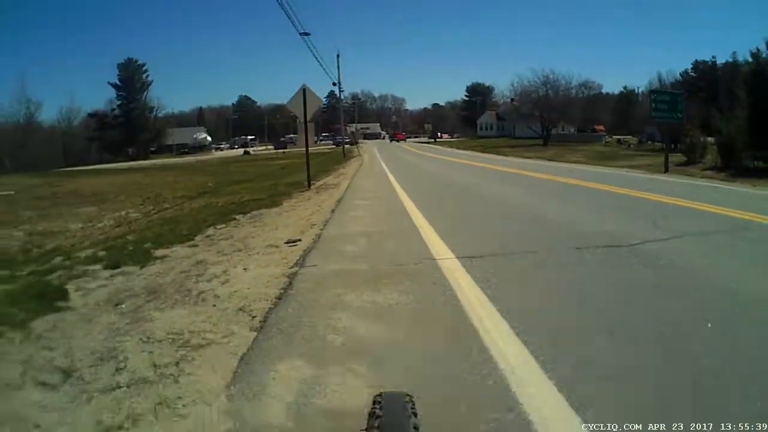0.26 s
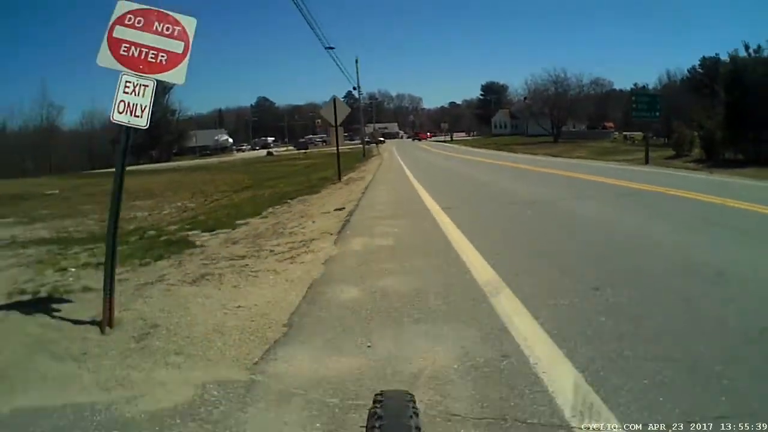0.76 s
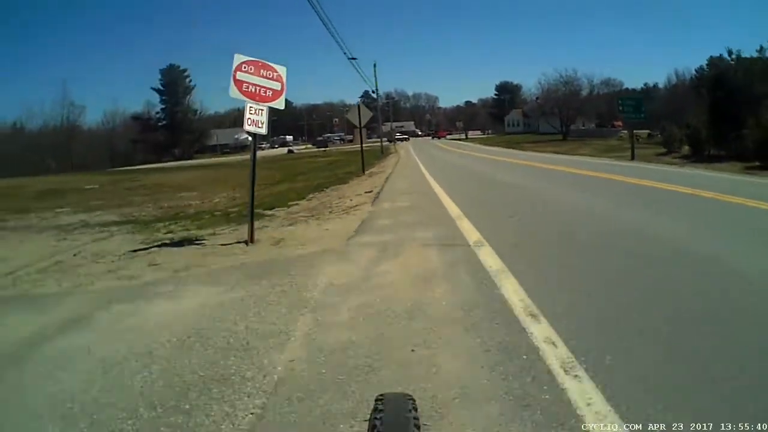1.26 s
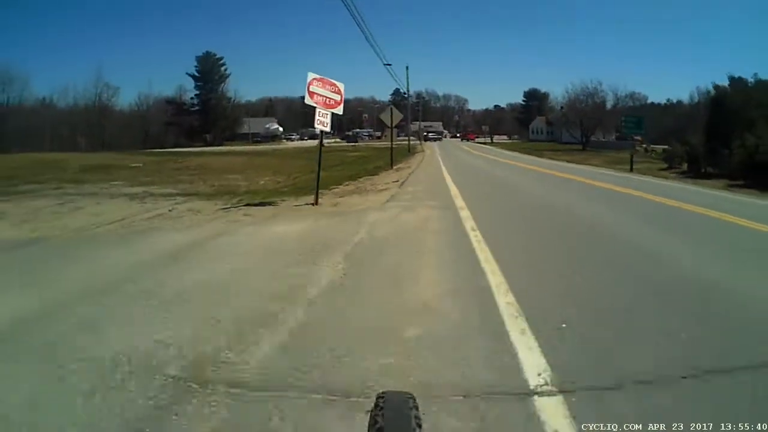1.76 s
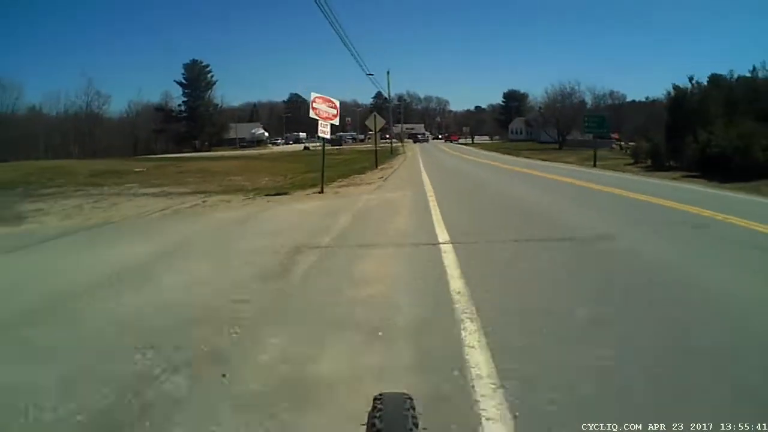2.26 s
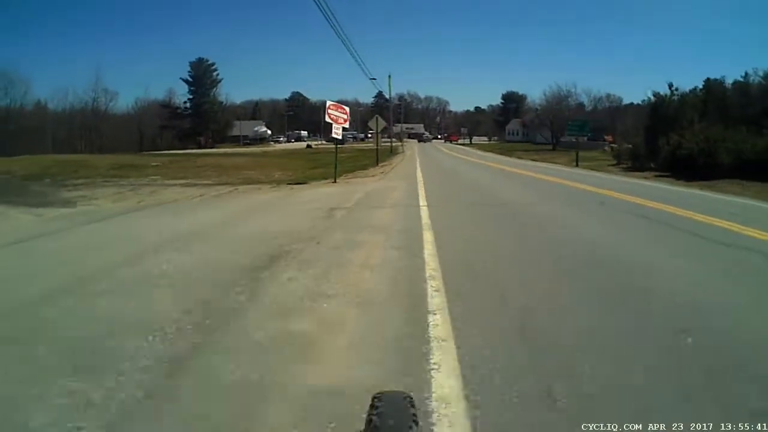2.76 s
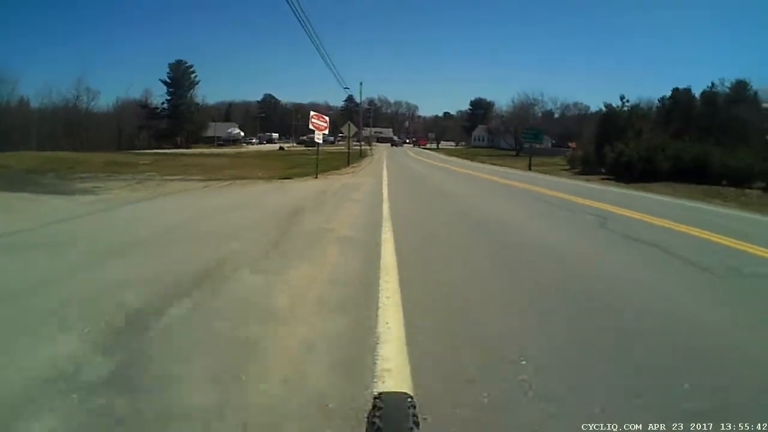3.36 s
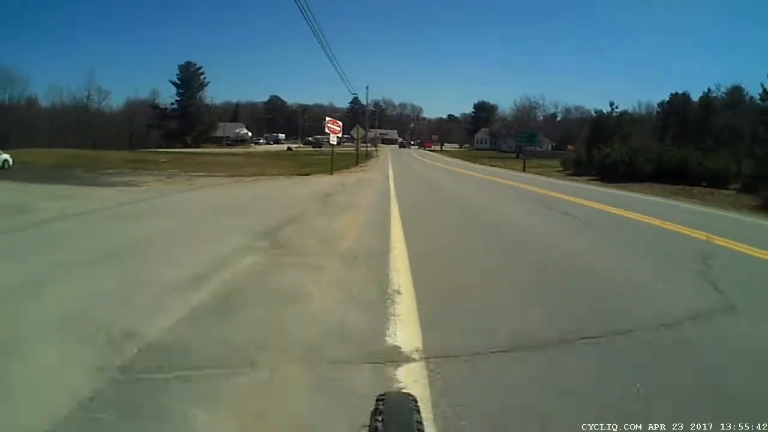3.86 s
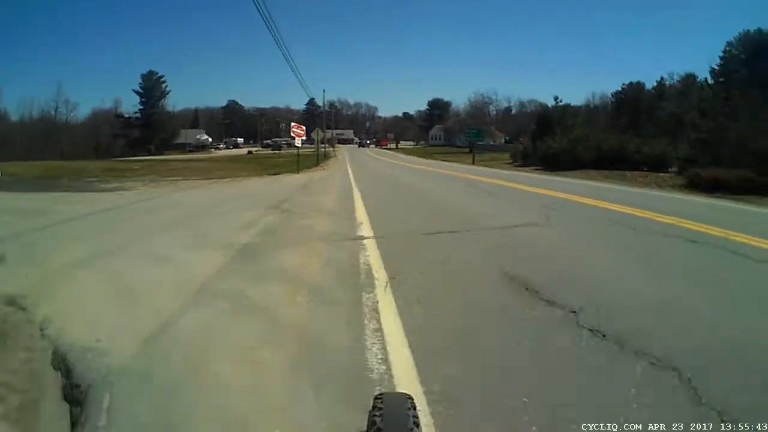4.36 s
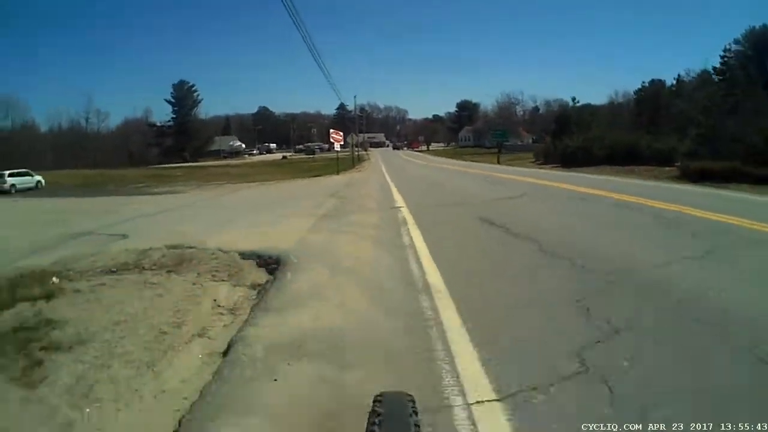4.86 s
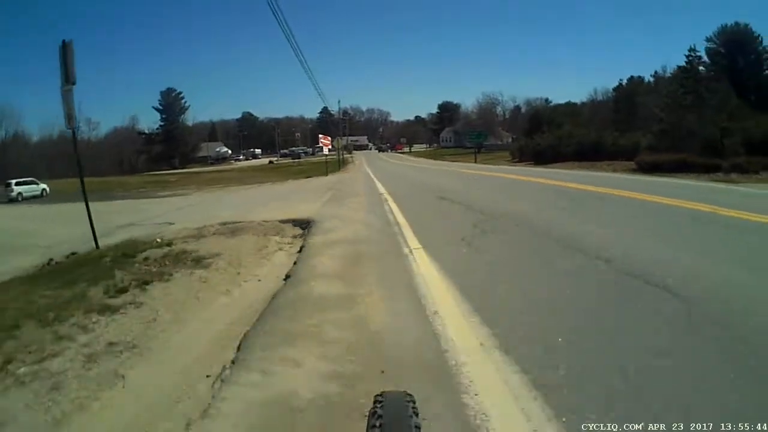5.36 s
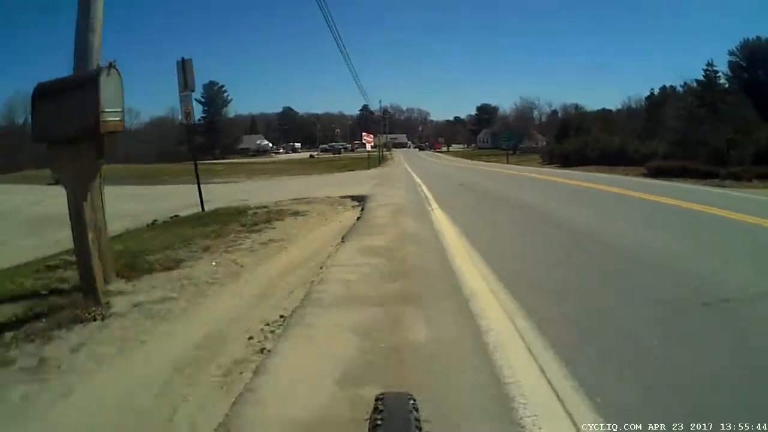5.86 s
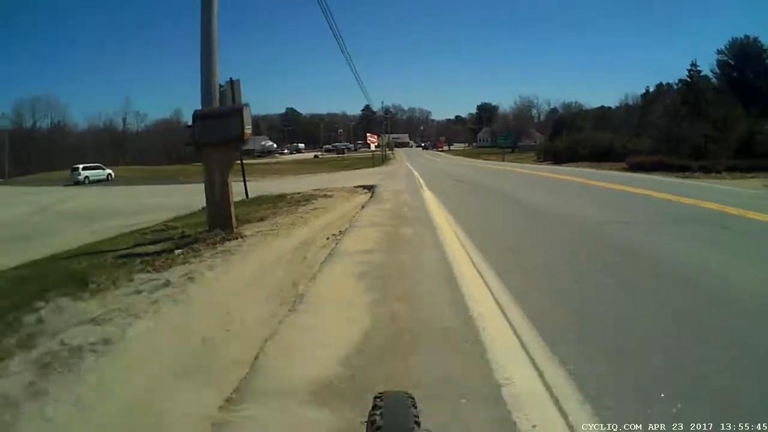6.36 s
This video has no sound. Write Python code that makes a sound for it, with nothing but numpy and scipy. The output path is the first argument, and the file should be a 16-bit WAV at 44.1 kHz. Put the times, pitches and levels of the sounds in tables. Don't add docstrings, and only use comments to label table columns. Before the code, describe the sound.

Outdoors on a paved road, a small housed microphone under a bicycle saddle hears everything close and dry, in mono. Deep wind rumble and a low, wavering tyre hum through the frame run throughout, with a very faint, rapid chain purr and slight hiss. From 0 to 2 s the tyres cross sand: dense, fine crunching with scattered hard ticks of pebbles and chips, loudest around 0.1 and 0.8 s, while gusts thump between 0.7 and 1.6 s. Around 2 s the grit fades to cleaner road; gusts thud near 2.1, 2.7 to 2.9 and 3.5 s, with quick flaps. About 4 to 4.6 s is calmest, mostly hum. From 4.7 s lighter grit and ticks return. After 5.4 s wind swells into a squall, heavy thumps and bright, ragged snaps crowding together, strongest from 6 s to the abrupt end at 6.6 s.

```python
import sys
import numpy as np
from scipy import signal
from scipy.io import wavfile

SR = 44100
rng = np.random.default_rng(int(sys.argv[2]) if len(sys.argv) > 2 else 0)


def makeup_ratio(level_db):
    decades = np.asarray(level_db, float) / 20
    return 10 ** decades


def persist_wave(psi):
    counts = np.round(np.clip(psi, -1, 1) * 32767).astype(np.int16)
    wavfile.write(sys.argv[1], SR, np.atleast_2d(counts).T)


N = 291972
T = np.arange(N) / SR

# (time [s], buffet level [dB])
WIND = [(0.0, -32.5), (0.3, -34), (0.7, -31), (1.0, -32.5), (1.35, -29.5), (1.6, -31), (1.9, -32),
        (2.2, -23.5), (2.6, -33), (3.1, -31), (3.4, -29.5), (3.85, -35.5), (4.4, -40), (5.2, -35),
        (5.6, -31), (6.0, -27.5), (6.35, -25.5), (6.62, -25)]
# (peak time [s], length [s], buffet lift [dB], eddy lift [dB])
GUSTS = [(0.423, .2, 1, 1), (0.674, 0.15, 7.5, 1), (0.846, 0.16, 10, 8), (0.94, 0.17, 12.5, 3),
         (1.166, 0.17, 7.5, -2), (1.49, 0.15, 9, 10.5), (1.76, 0.12, 4.5, -2), (2.177, 0.33, 1.5, 7),
         (2.708, 0.085, 13.5, 0), (2.83, 0.15, 9, 6), (2.934, 0.069, 10, 1), (3.524, 0.063, 12.5, 4),
         (3.577, 0.16, 8, 3.5), (3.86, 0.19, 8.5, -1.5), (5.385, 0.51, 4.5, 0.5), (5.584, 0.25, 10.5, 8.5),
         (5.7, 0.093, 9, 9), (5.782, 0.23, 7.5, 12.5), (5.843, 0.089, 8, 16), (6.021, 0.11, 9, 7),
         (6.121, 0.11, 8.5, 10), (6.278, .11, 7.5, 18.5), (6.461, 0.16, 12, 14), (6.524, 0.15, 11, 13)]
# (frequency [Hz], density [dB/Hz])
BUFFET_SPECTRUM = [(8, 16), (25, 20), (45, 14.5), (70, 12), (110, -24.5), (200, -59), (800, -110)]
# (frequency [Hz], density [dB/Hz])
FLUTTER_SPECTRUM = [(40, -14), (80, -10), (150, -3), (250, -10), (500, -22.5), (1000, -54.5), (4000, -110)]
# (time [s], peak [dB], quickness [Hz], push +1 or suck -1)
LUMPS = [(0.812, -22, 59, 1), (0.927, -18.5, 40.3, -1), (1.104, -17, 73.6, 1), (1.178, -18.5, 41.5, 1),
         (1.468, -11.5, 33.4, -1), (1.606, -17, 53, -1), (2.069, -18.5, 44.8, 1), (2.185, -27, 33.5, 1),
         (2.678, -19, 37.7, -1), (2.806, -16.5, 48.6, -1), (2.845, -19, 71.4, -1), (2.927, -15, 52, 1),
         (3.395, -20, 53, 1), (3.545, -21, 34, -1), (3.674, -20, 32.3, 1), (3.888, -18, 62.3, -1),
         (4.073, -21, 31, -1), (4.755, -26, 69, -1), (4.936, -25, 62.4, 1), (5.625, -20, 47.5, 1),
         (5.707, -15, 57.4, 1), (5.777, -13, 63.4, 1), (6.009, -12, 51, -1), (6.113, -23.5, 58, -1),
         (6.223, -20, 55.6, -1), (6.318, -16.5, 35, 1), (6.351, -18, 52.4, 1), (6.44, -13.5, 90, -1),
         (6.491, -14.5, 61.5, 1), (6.545, -22, 57, -1),
         (2.699, -17.5, 200, 1),
    (2.802, -20.5, 340, 1),
    (3.1, -25, 110, -1),
    (6.468, -18, 170, -1),
    (5.4, -27, 340, -1),
    (3.503, -22, 150, 1),
    (3.529, -23, 150, 1),
         (0.533, -20.5, 240, -1), (0.838, -19.5, 107, 1), (0.865, -23, 185, -1), (0.975, -20, 185, 1),
          (1.394, -22.5, 242, -1), (1.436, -19, 79, 1), (1.489, -15.5, 102, -1), (1.506, -24, 185, 1),
          (1.525, -28, 185, -1), (1.998, -24, 185, -1), (2.015, -23, 59.5, -1), (2.041, -23.5, 235, -1),
          (2.099, -24, 184, -1), (2.118, -19.5, 185, 1), (3.299, -26.5, 103, 1), (3.494, -21.5, 240, -1),
          (3.511, -27, 185, 1), (3.874, -31, 240, 1), (4.426, -25, 243, 1), (5.518, -25.5, 185, 1),
          (5.569, -22, 240, -1), (5.804, -23, 185, 1), (5.821, -15.5, 104, 1), (5.84, -19, 240, -1),
          (5.878, -15, 242, 1), (6.054, -24, 183, -1), (6.336, -17.5, 184, -1), (6.523, -15, 80, -1)]
CALM_DB = -33
GUST_RISE, GUST_HOLD = 0.6, 0.15
BUFFET_LIFT_DB_PER_DB, FLUTTER_DB, FLUTTER_DB_PER_DB = 0.7, -48.5, 0.99

# (frequency [Hz], density [dB/Hz])
EDDY_BODY_SPECTRUM = [(100, -40), (300, 4), (700, -0.5), (1200, -7), (1800, -26), (3000, -46.5),
                      (8000, -110)]
# (frequency [Hz], density [dB/Hz])
EDDY_EDGE_SPECTRUM = [(500, -34), (1200, -1), (1900, 3), (2800, -8.5), (4400, -18), (6000, -35),
                      (10000, -100)]
# (time [s], peak [dB])
PUFFS = [(0.653, -31), (0.660, -22.5), (0.824, -33), (0.961, -41), (1.451, -19), (1.473, -25.5),
         (1.501, -44), (1.526, -36), (2.103, -25), (2.129, -25), (2.201, -29), (2.697, -30), (2.79, -39),
         (2.862, -28.5), (3.118, -31), (3.522, -26), (5.061, -34), (5.293, -27), (5.469, -32)]
# (time [s], peak [dB], edge re peak [dB])
EDGED_PUFFS = [
    (1.3, -27, -10),
    (1.9, -34, 1),
    (1.5015, -37, 4),
    (1.8, -35, -10),
    (2.862, -40, -8),
    (0.66, -38, -8),
    (0.66, -43, -12),
    (1.1, -34, -8),
               (5.536, -32, -24.5), (5.553, -26, -32), (5.589, -26, -30), (5.599, -21.5, -16),
                (5.681, -29, -15), (5.694, -19, -15), (5.715, -24.5, -5), (5.746, -24, -16),
                (5.765, -25, -18), (5.788, -33, -14), (5.806, -33, -12), (5.824, -24, -9), (5.84, -31, -9),
                (5.853, -25, -7), (5.867, -19, -17), (5.729, -32, -11), (5.757, -30, -14),
                (5.775, -30, -14), (5.876, -28, -20), (5.858, -25, -11), (6.013, -24, -11),
                (6.05, -15, -39), (6.086, -25, -9), (6.113, -13.5, -18), (6.178, -24.5, -26),
                (6.222, -20, -10), (6.241, -28, -8), (6.252, -22.5, -3.5), (6.259, -35, -2),
                (6.265, -29, -1), (6.271, -36, -6), (6.283, -21.5, -6), (6.294, -28, -8), (6.307, -27, -4),
                (6.289, -23, -3), (6.328, -19, -18), (6.337, -23, -6.5), (6.38, -24.5, -9),
                (6.403, -21, -16), (6.441, -29, -10), (6.533, -30, -1), (6.56, -17.5, -19),
                (6.431, -25, -4), (6.459, -11, -18), (6.501, -24, -13), (6.519, -15, -12.5),
                (6.547, -19.5, -13)]
EDDY_DB, EDDY_DB_PER_DB = -52, 0.11
PUFF_EDGE_DB, PUFF_S, SNAP_DB = -17, 0.0082, 8

# (time [s], frame hum [dB])
ROLL = [(0.0, -36.5), (0.42, -34), (0.7, -35.5), (0.83, -32.5), (1.0, -36.5), (1.6, -33), (2.27, -35.5),
        (2.36, -34.5), (2.86, -35), (3.05, -39), (3.4, -39.5), (3.9, -35.5), (4.0, -38), (4.37, -33),
        (4.6, -35.5), (5.3, -37), (5.84, -32), (6.62, -39)]
# (time [s], level re main ring [dB])
FAVOUR = [(0.0, 3), (0.75, -3.5), (2.5, -1), (2.95, -0.5), (3.4, 8.5), (3.9, 4), (4.25, 1.5), (4.4, -6),
          (4.9, 1.5), (5.3, 1.5), (6.62, -1)]
# (time [s], length [s], lift [dB])
JOLTS = [
    (0.417, 0.23, 5),
    (0.83, 0.17, 9),
    (1.095, 0.11, 11.5),
    (1.584, 0.23, 4.5),
    (2.45, 0.13, -4),
    (4.596, 0.24, -9.5),
    (4.795, 0.31, 5.5),
    (5.4, 0.32, 8.5),
]
# (frequency [Hz], width [Hz], level [dB])
FRAME_LOW = [(84, 31.6, 0)]
# (frequency [Hz], width [Hz], level [dB])
FRAME_RING = [(288.6, 52, 0)]
# (frequency [Hz], width [Hz], level [dB])
FRAME_HIGH = [(217, 25, -6.5), (351.4, 34.7, -2), (429.7, 59, -7), (502.2, 33, -12.5)]
# (frequency [Hz], width [Hz], level [dB])
HOUSING = [(754, 60, 12), (918, 140, 6.5), (1257, 750, 2), (2103, 770, 0.5), (2930, 540, -6.5),
           (4000, 1300, -13.5)]
TREAD_DB, ROLL_REF_DB = -53, -35.5
LOW_HUM_DB, LOW_HUM_ROAD_DB_PER_DB, LOW_HUM_WIND_DB_PER_DB = -35, 0.94, 0.44

# (frequency [Hz], width [Hz], level [dB])
CHAIN_RING = [(4000, 680, 7), (4500, 760, -11.5)]
CHAIN_DB, LINKS_PER_S = -61.5, 53.5

# (middle time [s], length [s], crunch level [dB])
DRIFTS = [(0.15, 0.97, -52.5), (1.1, 1.2, -50.5), (0.28, 0.018, -43), (0.452, 0.13, -46),
          (0.607, 0.14, -42), (0.762, 0.17, -40.5), (0.957, 0.12, -47), (1.187, 0.13, -45.5),
          (1.395, 0.12, -44.5), (1.491, 0.07, -44.5), (1.589, 0.086, -43.5), (1.7, .13, -41.5),
          (1.85, 0.2, -52), (4.75, 0.13, -50.5), (4.903, 0.12, -48.5), (5.3, 1.2, -52), (5.16, 0.03, -46),
          (5.207, 0.034, -46.5), (5.495, 0.093, -44), (5.603, .05, -50), (5.71, 0.054, -46.5),
          (5.867, 0.18, -49), (5.946, 0.057, -43.5), (6.09, 0.024, -48), (6.163, 0.069, -48),
          (6.363, 0.093, -56.5), (6.53, .07, -54)]
# (frequency [Hz], density [dB/Hz])
GRIT_SPECTRUM = [(600, -17), (1500, -6.5), (2300, -3.5), (2900, -7.5), (3500, -2), (4500, -4),
                 (5500, -11.5), (6700, -19.5), (9000, -40), (13000, -85)]
# (frequency [Hz], density [dB/Hz])
SHARP_GRIT_SPECTRUM = [(2500, -26), (4500, 2.5), (6700, -4), (9300, -9), (10500, -15), (13000, -55)]
# (frequency [Hz], width [Hz], level [dB])
GRAIN_RINGS = [(3230, 700, -4.5), (3950, 470, 1), (4500, 600, 1.5), (5150, 1050, -4.5)]
CLEAN_ROAD_DB, DRIFT_EDGE_DB, DRIFT_SQUARENESS = -56.5, -4, 2.4

# (time [s], peak [dB], ring [Hz], edge level [dB])
PEBBLES = [(0.0793, -19.5, 4280, -74), (0.125, -43, 3950, -50), (0.412, -42, 3900, -52),
           (0.5318, -33, 4320, -41), (0.598, -33, 4200, -51), (0.6970, -27.5, 4140, -60),
           (0.7255, -29, 4660, -48), (0.7925, -18, 4480, -48), (1.0434, -33.5, 3800, -49),
           (1.1362, -30, 4900, -55), (1.379, -38, 3950, -34), (1.4378, -30, 4200, -53),
           (1.4893, -32, 4900, -57), (1.708, -32.5, 4320, -62), (1.7845, -26.5, 4800, -40),
           (1.8922, -47, 4220, -44), (2.4525, -45, 4130, -49), (3.096, -42, 4150, -46),
           (3.5929, -53, 4030, -50), (3.7575, -46, 4060, -48), (4.8712, -40, 4500, -46),
           (4.9535, -34, 4500, -47), (5.149, -39, 4560, -45), (5.4454, -33, 4200, -63),
           (5.5885, -30.5, 4400, -50), (5.7043, -35, 4500, -47), (5.9313, -25, 4150, -47),
           (6.0844, -39, 4500, -60), (6.5189, -38, 4700, -48), (6.5528, -35, 4150, -69)]
# (frequency [Hz], level [dB], T60 [s])
PEBBLE_BODY = [(1630, -14, 0.012), (2255, -22.5, 0.048), (2920, -15.5, 0.017)]
# (time [s], peak [dB])
CHIPS = [(0.268, -40), (0.5566, -40), (0.829, -36), (0.9632, -37), (1.098, -36), (1.197, -42),
         (1.225, -36.5), (1.476, -39), (1.585, -36), (1.6556, -36), (1.841, -41), (3.0636, -42),
         (4.4815, -45), (5.1058, -41), (5.2382, -39), (5.356, -37), (5.484, -39), (5.5083, -31),
         (5.6898, -41), (5.8474, -37), (5.896, -36), (5.956, -35), (6.1346, -37.5), (6.317, -43),
         (0.5832, -42), (0.684, -37), (0.7075, -36), (0.7439, -38), (0.7683, -39), (0.814, -40),
         (0.918, -42), (0.947, -45), (0.998, -40), (1.2684, -46), (1.422, -35), (1.428, -37), (1.5662, -41),
         (1.5942, -37), (1.6115, -39), (1.6702, -30), (1.678, -40), (1.718, -31), (1.728, -34),
         (1.744, -37), (5.2012, -43.5), (5.274, -41), (5.3327, -41), (5.3883, -40), (5.719, -42),
         (5.802, -44), (5.8225, -44), (5.8594, -42), (5.945, -30), (0.842, -36), (3.494, -51), (3.568, -47),
         (3.682, -48), (6.09, -38), (6.194, -44), (6.3507, -43), (6.3815, -44), (6.4767, -49), (6.524, -40)]
CHIP_HZ, CHIP_EDGE_DB = 4100, -13.5

# (frequency [Hz], density [dB/Hz])
HISS_SPECTRUM = [(20, 1), (6000, 0), (9000, 1.5), (14500, 0.5), (15500, 0), (16200, -50)]
HISS_DB = -70


def evened(x):
    return x / np.sqrt(np.mean(x ** 2) + 1e-20)


def coloured(x, points):
    f_hz, level_db = np.transpose(points)
    hz = np.abs(np.fft.fftfreq(16384, 1 / SR))
    log_gain = np.log(makeup_ratio(np.interp(np.log(hz + 1), np.log(f_hz + 1), level_db)))
    taps = np.fft.ifft(np.exp(np.conj(signal.hilbert(log_gain)))).real[:8192]
    return signal.oaconvolve(x, taps / np.linalg.norm(taps))[:N]


def resonate(x, modes):
    out = np.zeros(N)
    for k, (hz, width_hz, db) in enumerate(modes):
        pole = np.exp(-np.pi * width_hz / SR) * np.exp(2j * np.pi * hz / SR)
        once = signal.lfilter([1 - abs(pole)], [1, -pole], x)
        twice = signal.lfilter([1 - abs(pole)], [1, -pole], once).real
        out += (-1) ** k * makeup_ratio(db) * twice
    return evened(out)


def flicker(low_hz, high_hz, depth_db):
    sos = signal.butter(1, [low_hz, high_hz], "bandpass", fs=SR, output="sos")
    waver = evened(signal.sosfilt(sos, rng.standard_normal(N)))
    return evened(makeup_ratio(depth_db * np.clip(waver, -3, 2)))


def add(mix, s, sound):
    part = mix[max(round(s * SR), 0):][:len(sound)]
    part += sound[:len(part)]


def curve(table):
    return np.interp(T, *np.transpose(table))


def hump(s, length_s, rise, hold):
    rise, hold = np.clip([rise, hold], 0.02, 0.95)
    corners = np.array([-rise, -rise * hold, (1 - rise) * hold, 1 - rise])
    return np.interp(T, s + length_s * corners, [0, 1, 1, 0])


def gusts(column):
    return np.max([row[column] * hump(row[0], row[1], GUST_RISE, GUST_HOLD) for row in GUSTS], axis=0)


def buffet():
    noise = rng.standard_normal((2, N))
    lumps, busy = np.zeros((2, N))
    for s, db, hz, push in LUMPS:
        u = np.arange(-1.2, 1.2, hz / SR)
        start_s = s + u[0] / hz
        swing = np.cos(2 * np.pi * u) * np.exp(-5.5 * u ** 2)
        add(lumps, start_s, np.sign(push) * makeup_ratio(db + 1.5) * swing)
        add(busy, start_s, np.exp(-2.5 * u ** 2))
    wind_db, gust_db = curve(WIND), gusts(column=2)
    rumble = makeup_ratio(wind_db + BUFFET_LIFT_DB_PER_DB * gust_db) * coloured(noise[0], BUFFET_SPECTRUM)
    rumble = rumble * np.clip(1 - 1.14 * busy, 0, 1)
    flutter_db = 5.0 + FLUTTER_DB + FLUTTER_DB_PER_DB * (wind_db - CALM_DB) + gust_db
    flutter = coloured(noise[1] * flicker(23, 75, depth_db=2.0), FLUTTER_SPECTRUM)
    return lumps + rumble + makeup_ratio(flutter_db) * flutter


def eddies(per_s=1700, spread_db=3.5, smooth=0.67):
    sign = np.where(rng.random(N) < 0.3, 1, -1)
    size = makeup_ratio(spread_db * np.minimum(rng.exponential(1, N), 2.5)) * sign
    spikes = evened(size * (rng.random(N) < per_s / SR))
    drive = evened(spikes + smooth * rng.standard_normal(N))
    steady_db = EDDY_DB + EDDY_DB_PER_DB * (curve(WIND) - CALM_DB) + gusts(column=3)
    steady = makeup_ratio(steady_db) * flicker(25, 125, depth_db=2.5)
    body, edge = makeup_ratio(2.0) * steady, makeup_ratio(-12.5) * steady
    t = np.arange(2600) / SR
    shape = np.minimum(t / 0.0033, 1) * np.exp(-(t / PUFF_S) ** 3)
    snaps = np.zeros((2, N))
    plain = [(s, db, PUFF_EDGE_DB) for s, db in PUFFS]
    for s, db, edge_db in plain + EDGED_PUFFS:
        add(body, s - 0.0045, makeup_ratio(db - 11.0) * shape)
        add(edge, s - 0.004, makeup_ratio(db + edge_db - 11.0) * shape)
        snaps[:, round(s * SR)] -= makeup_ratio([db + SNAP_DB, db + edge_db + SNAP_DB])
    low = coloured(drive * body + snaps[0], EDDY_BODY_SPECTRUM)
    return low + coloured(drive * edge + snaps[1], EDDY_EDGE_SPECTRUM)


def tyres():
    noise = rng.standard_normal((3, N))
    roll_db, favour_db = curve(ROLL), curve(FAVOUR)
    low_db = LOW_HUM_DB + sum(db * hump(s, length_s, 0.59, 0.072) for s, length_s, db in JOLTS)
    low_db = low_db + LOW_HUM_ROAD_DB_PER_DB * (roll_db - ROLL_REF_DB)
    low_db = low_db + LOW_HUM_WIND_DB_PER_DB * (curve(WIND) - CALM_DB)
    low = makeup_ratio(low_db) * resonate(noise[0] * flicker(4.5, 28, depth_db=3.0), FRAME_LOW)
    shake = noise[1] * flicker(4.3, 72, depth_db=2.5)
    ring = makeup_ratio(-4.5 - 0.43 * favour_db) * resonate(shake, FRAME_RING)
    upper = makeup_ratio(-7.0 + 0.44 * favour_db) * resonate(shake, FRAME_HIGH)
    tread = makeup_ratio(TREAD_DB) * resonate(noise[2] * flicker(4.4, 96, depth_db=-1.5), HOUSING)
    return low + makeup_ratio(roll_db) * (ring - upper) + tread


def chain():
    turns = T * LINKS_PER_S + 0.051
    link_size = makeup_ratio(5.3 * np.clip(rng.standard_normal(int(turns[-1]) + 1), -3, 1.4))
    scrape = 0.27 + link_size[turns.astype(int)] * np.exp(-(turns % 1) / 0.17)
    return makeup_ratio(CHAIN_DB) * resonate(scrape * rng.standard_normal(N), CHAIN_RING)


def cracks(per_s, spread_db, clump_db, tail_db, tail_s):
    size = makeup_ratio(spread_db * np.minimum(rng.exponential(1, N), 3.2)) * rng.choice([-1, 1], N)
    train = size * (rng.random(N) < per_s / SR) * flicker(23, 90, depth_db=clump_db)
    fading = signal.lfilter([1], [1, -np.exp(-1 / (tail_s * SR))], train ** 2)
    return evened(train + makeup_ratio(tail_db) * np.sqrt(fading) * rng.standard_normal(N))


def sand():
    depth_db = np.max([db + DRIFT_EDGE_DB * np.abs(2 * (T - s) / length_s) ** DRIFT_SQUARENESS
                       for s, length_s, db in DRIFTS], axis=0)
    power = makeup_ratio(np.maximum(depth_db, CLEAN_ROAD_DB)) ** 2
    level = np.sqrt(np.maximum(power - makeup_ratio(-59.5) ** 2, makeup_ratio(-70) ** 2))
    crunch = cracks(per_s=5000, spread_db=5.5, clump_db=4.7, tail_db=-21.0, tail_s=0.0018)
    crunch = coloured(crunch, GRIT_SPECTRUM)
    ticks = cracks(per_s=600, spread_db=1.0, clump_db=4.0, tail_db=-31.0, tail_s=0.0021)
    ticks = coloured(ticks, SHARP_GRIT_SPECTRUM)
    grains = np.zeros(N)
    for hz, width_hz, db in GRAIN_RINGS:
        hits = cracks(per_s=800, spread_db=6.0, clump_db=7.0, tail_db=-21.5, tail_s=0.0033)
        grains += makeup_ratio(db) * resonate(hits, [(hz, width_hz, 0)])
    dense = level * (makeup_ratio(-5.5) * crunch + makeup_ratio(-7.0) * evened(grains))
    return dense + makeup_ratio(-16.5) * level * (level / makeup_ratio(-48.5)) ** 0.1 * ticks


def chips():
    return [(s, db, CHIP_HZ * (0.99 + 0.14 * tone), db + CHIP_EDGE_DB + 10 * (edge - 0.5))
            for (s, db), (tone, edge) in zip(CHIPS, rng.random((len(CHIPS), 2)))]


def pebbles():
    out, t = np.zeros(N), np.arange(1300) / SR
    edge_band = signal.butter(6, [5200, 9800], "bandpass", fs=SR, output="sos")
    rattle_band = signal.butter(2, [2800, 5600], "bandpass", fs=SR, output="sos")
    snap = np.exp(-((t - 0.0007) / 0.00035) ** 2)
    body = sum(makeup_ratio(db - 60 * t / t60_s) * np.sin(2 * np.pi * hz * t) for hz, db, t60_s in PEBBLE_BODY)
    body = np.minimum(t / 0.00081, 1) * body
    click = 4.3 * (t == t[12])
    edge_shape = np.minimum(t / 0.0002, 1) * makeup_ratio(-60 * t / 0.0027)
    hits = PEBBLES + chips()
    for (s, db, ring_hz, edge_db), noise in zip(hits, rng.standard_normal((len(hits), len(t)))):
        ring = snap * np.sin(2 * np.pi * ring_hz * t)
        rattle = signal.sosfilt(rattle_band, noise * np.minimum(t / 0.0013, 1))
        rattle = makeup_ratio(-6.0 - 60 * t / 0.017) * rattle
        edge = signal.sosfilt(edge_band, (noise + click) * edge_shape)
        add(out, s, makeup_ratio(db + 4.5) * (ring + rattle + body) + makeup_ratio(edge_db + 6.0) * edge)
    return out


def scene():
    return (buffet() + eddies() + tyres() + chain() + sand() + pebbles())[None]


def roll_off(x):
    return signal.sosfilt(signal.butter(12, 15690, fs=SR, output="sos"), x)


def record(dry):
    hiss = makeup_ratio(HISS_DB) * coloured(rng.standard_normal(N), HISS_SPECTRUM)
    low_pass = signal.butter(14, 15400, fs=SR, output="sos")
    limited = signal.sosfilt(low_pass, dry + hiss)
    return roll_off(limited + 0.00088)


dry = scene()
out = record(dry)
persist_wave(out)
```